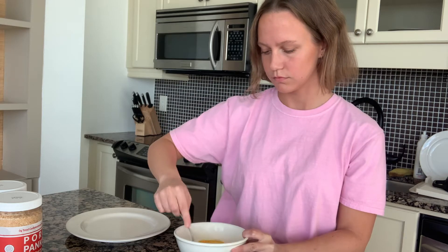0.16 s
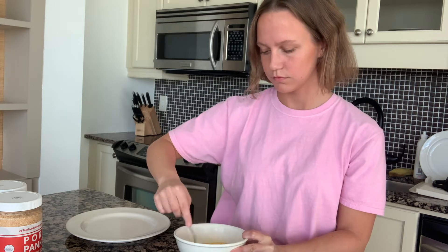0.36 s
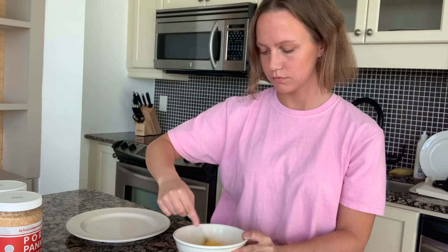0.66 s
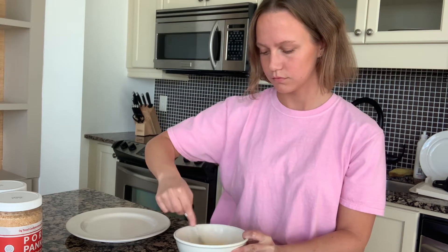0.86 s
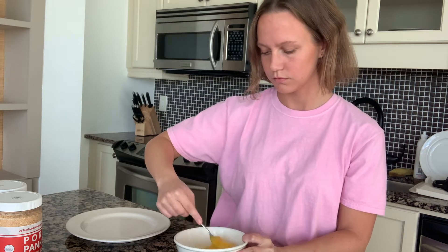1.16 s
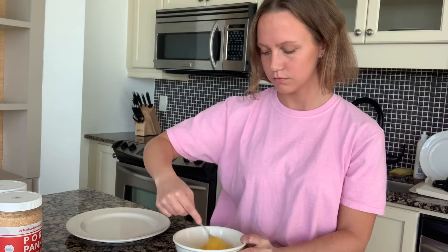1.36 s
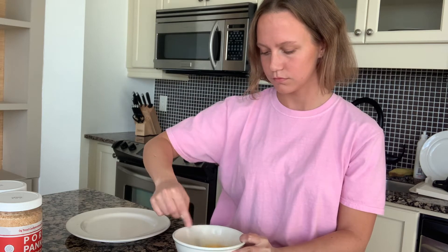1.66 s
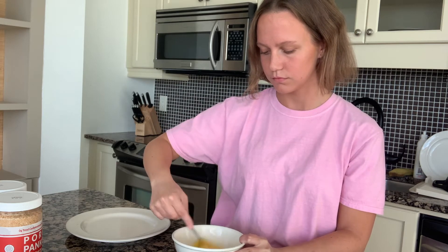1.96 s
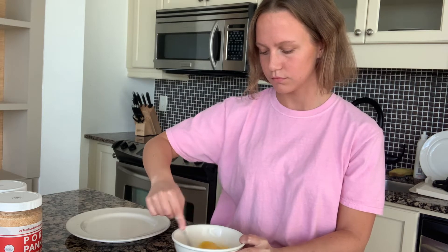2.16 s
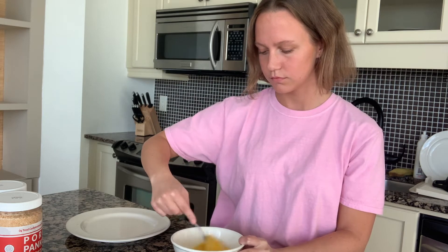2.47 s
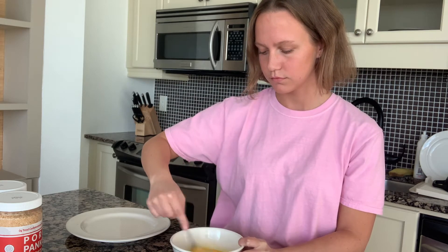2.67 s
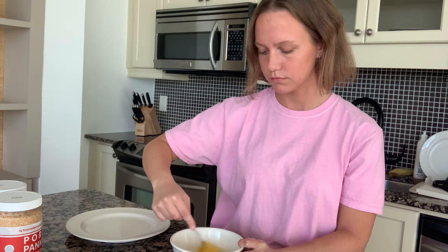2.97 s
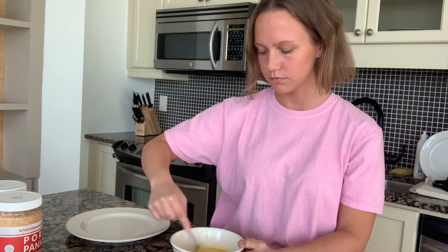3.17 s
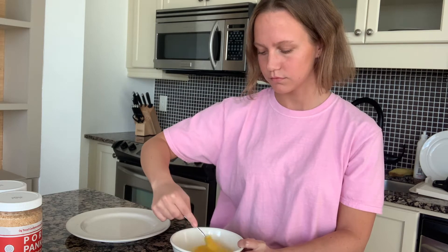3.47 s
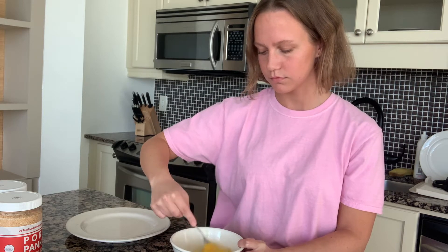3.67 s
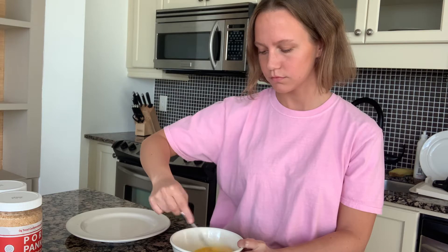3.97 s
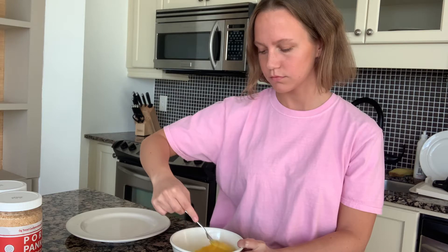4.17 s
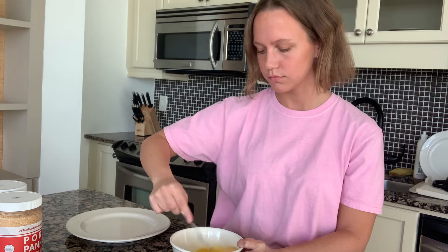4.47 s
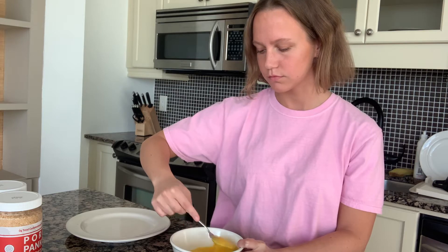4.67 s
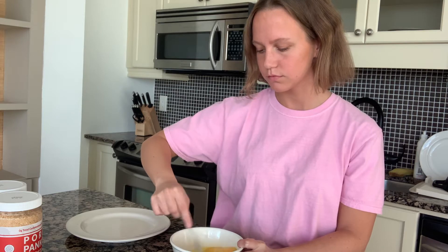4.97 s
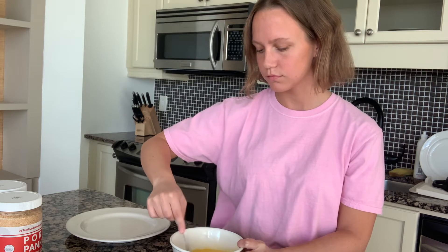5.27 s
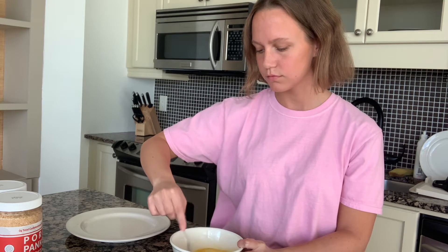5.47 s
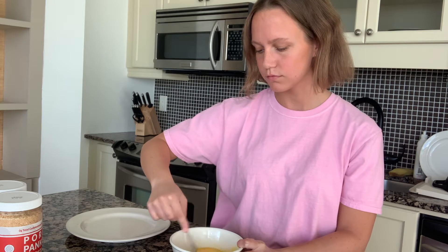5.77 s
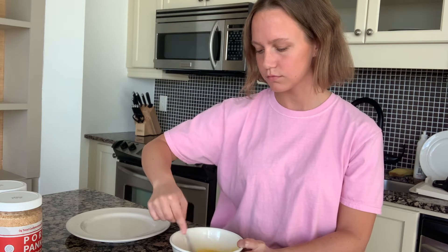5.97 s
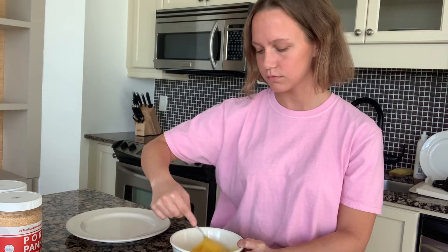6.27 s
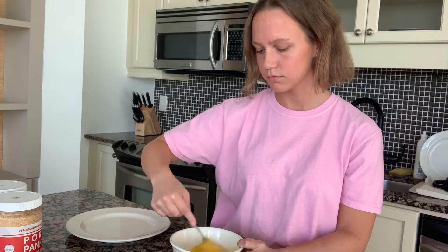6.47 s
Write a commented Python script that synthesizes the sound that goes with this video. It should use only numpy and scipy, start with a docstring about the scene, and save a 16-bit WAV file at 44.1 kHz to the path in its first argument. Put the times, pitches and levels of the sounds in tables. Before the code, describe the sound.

Close up, a fork beats eggs in a ceramic bowl, roughly four soft hissing, sloshing strokes a second, with light metal ticks and tiny rings on the glaze. Just after two seconds the bowl knocks hard on the stone counter in a short, dull clatter, far louder than the rest. The beating carries on, slightly wetter towards the end. Hard-walled kitchen with a short tail and quiet air; close stereo microphone.

```python
"""Fork beating eggs in a ceramic bowl

About four strokes a second hiss through the foam as random grains and slosh the egg as resonant noise.
Tines tick on and scrape the glaze (noise bursts) and rub it (narrow bands), amid short gliding tones.
Knocks of the bowl on a stone counter, once a loud clatter, and light fork taps on it are decaying tones.
A hard-walled kitchen adds a decaying diffuse tail over quiet air; two close microphone ports listen."""
import sys
import numpy as np
from scipy import signal
from scipy.fft import rfft, irfft, next_fast_len
from scipy.io import wavfile
from scipy.ndimage import uniform_filter1d

SR = 44100
rng = np.random.default_rng(int(sys.argv[2]) if len(sys.argv) > 2 else 0)


def digitize_waveform(pressure):
    """Quantize a signal to 16-bit integers and store it at the path in sys.argv[1].

    Rows of a 2-D input are taken as channels; values are limited to [-1, 1].
    """
    field = np.atleast_2d(pressure).T
    bounded = np.clip(field, -1, 1)
    quanta = np.round(bounded * 32767).astype(np.int16)
    wavfile.write(sys.argv[1], SR, quanta)


N = 291942


def amp(db):
    """Level law: decibels to amplitude gain."""
    return 10 ** (np.asarray(db) / 20)


def unit(x):
    """Power normalisation: scale to rms 1."""
    return x / np.sqrt(np.mean(x ** 2) + 1e-20)


def along(points, hz):
    """Log-frequency interpolation of (frequency_hz, value) points."""
    f, v = np.transpose(points)
    return np.interp(np.log(hz + 1), np.log(f + 1), v)


def filtered(x, response):
    """Linear filtering: multiply the spectrum of x by a function of frequency."""
    n = x.shape[-1]
    padded = next_fast_len(n + 8192)
    spectrum = rfft(x, padded) * response(np.fft.rfftfreq(padded, 1 / SR))
    return irfft(spectrum, padded)[..., :n]


def coloured(x, spectrum):
    """Spectral shaping: x with the given colour, at rms 1."""
    return unit(filtered(x, lambda hz: amp(along(spectrum, hz))))


def add(track, s, sound):
    """Superposition: mix a sound into the track at s seconds, cut at both ends of the track."""
    i = min(round(s * SR), N)
    part = sound[..., max(-i, 0):N - i]
    start = max(i, 0)
    track[..., start:start + part.shape[-1]] += part


def grains(per_s):
    """Poisson-like impulses: tiny bursts at random moments and of random size, rms 1."""
    present = rng.random(N) < per_s / SR
    size = rng.standard_normal(N) * amp(2 * rng.standard_normal(N))
    return unit(present * size)


RISE_PER_LENGTH = 0.2743  # longer strokes also take longer to build
FALL_CURVE = 0.15  # how much a decay steepens


def swell(length, rise, fall_db, step=0):
    """Driven envelope: jumps to the share step, builds, and from its length on dies ever faster."""
    t = np.arange(SR // 2) / SR
    build = np.clip(t / (rise + RISE_PER_LENGTH * length), 0, 1) ** 0.8
    after = np.clip(t - length, 0, 1)
    # fall_db is the mean dB per second over the first 0.1 s of decay
    fall = amp(-fall_db * after * (10 * after) ** FALL_CURVE)
    return (step + (1 - step) * build) * fall


CATCH_HZ = 42.97  # the fork catches and slips up to this often


def flutter(size, depth_db):
    """Stick-slip friction: the uneven gain of a fork that catches and slips, rms 1."""
    slow = unit(filtered(rng.standard_normal(size), lambda hz: hz < CATCH_HZ))
    return unit(amp(depth_db * slow))


# How deep the fork digs into the egg: start_s [s], depth_db [dB of low churn relative to effort]
DEPTH = [(0, -14.5), (.85, -29.5), (1.5, -17), (3.1, -11), (3.8, -18.5), (4.1, -9.5), (5, -4.5),
         (5.5, -12.5), (5.72, -4), (6, -16.5), (6.6, -1)]


def depth(s):
    """Immersion: the fork's depth in the egg at s seconds, interpolated in dB."""
    return np.interp(s, *np.transpose(DEPTH))


# Likeness of diffuse sound at the two ports: frequency_hz [Hz], correlation [-1 to 1]
ALIKE = [(200, 0.89), (1000, 0.15), (3000, 0.091)]


def diffuse(size):
    """Diffuse-field coherence: stereo noise alike in the bass and nearly unrelated in the treble."""
    turn = lambda hz: np.arccos(np.clip(along(ALIKE, hz), -1, 1)) / 2
    # the angle shares power between what the ports have in common and what differs
    split = lambda hz: np.array([np.cos(turn(hz)), np.sin(turn(hz))])
    mid, side = filtered(rng.standard_normal((2, size)), split)
    return np.array([mid + side, mid - side])


# Spectrum of the room's air: frequency_hz [Hz], density_db [relative dB per Hz]
AIR = [(20, -26.5), (60, -12.5), (180, -1.5), (400, -6), (1500, -13.5), (4000, -26), (16000, -53.5)]


def room_air(level_db=-73.0):
    """Ambient noise: steady diffuse noise, strongest in the low register."""
    return amp(level_db) * coloured(diffuse(N), AIR)


# Decay of the kitchen's tail: frequency_hz [Hz], t60_s [s]
DECAY = [(150, 0.4), (500, 0.7644), (2000, 0.5866), (4500, 0.56), (15000, 0.27)]
# Colour of the kitchen's tail: frequency_hz [Hz], gain_db [dB]
ECHO = [(4000, 1.5), (7000, 4), (15000, -24)]


def kitchen(x, gap=0.0049, early_db=7, early_s=0.0078):
    """Reverberation: close reflections off counter and cupboards, then a tail that dies by frequency."""
    hz, t, z = signal.stft(diffuse(SR * 3 // 4), SR, nperseg=256)
    tail = signal.istft(z * amp(-60 * t / along(DECAY, hz)[:, None]), SR, nperseg=256)[1]
    t = np.arange(tail.shape[1]) / SR
    # reflections fade in from half the gap to one and a half gaps, strongest early
    onset = np.clip(t / gap - .5, 0, 1)
    tail = tail * onset * (1 + amp(early_db) * np.exp(-t / early_s))
    tail = filtered(tail / np.linalg.norm(tail[0]), lambda hz: amp(along(ECHO, hz)))
    return signal.fftconvolve(x[None], tail, axes=1)


# Phase between the ports: frequency_hz [Hz], left_lead_rad [radians]
LEAD = [(0, 0), (1120, 0.2), (2500, 2.2), (3880, 1.2), (5860, 3.5), (6980, 0.2), (8100, -0.6),
        (11100, -6.2), (14300, -12.3), (16400, -13.0)]


def ports(x, left_db=3):
    """Inter-channel differences: two ports with unequal phase, the middle register louder on the left."""
    f, radians = np.transpose(LEAD)
    tilt = [(200, 0.058), (700, 1), (6000, 0.12)]  # Hz, share of left_db

    def half(hz):
        """Half the difference: one port takes it, the other its inverse."""
        return amp(left_db / 2 * along(tilt, hz)) * np.exp(.5j * np.interp(hz, f, radians))

    return filtered(x, lambda hz: np.array([half(hz), 1 / half(hz)]))


# Knocks of the bowl on the counter and light fork taps on the bowl:
# start_s [s], level_db [relative dB], hardness_hz [Hz]
KNOCKS = [(1.199, -51.5, 2620), (2.2358, -7.5, 2080), (2.411, -2.5, 4600), (2.421, -13.5, 3550),
          (2.602, -19, 1974), (2.6369, -8.5, 2780), (2.6916, -17, 2600), (3.0516, -29.5, 1264),
          (4.5158, -39.5, 1790), (5.196, -36.5, 1250), (5.703, -42.5, 1950), (6.028, -36, 2700),
          (6.601, -39, 2540)]
# Ringing of the knocks, short bowl modes and two long faint low resonances:
# pitch_hz [Hz], level_db [relative dB], t60_s [s]
RINGING = [(572, -47.5, .7), (681, -37.5, 0.77), (975, 0.5, 0.022), (1036, 2.5, 0.013), (1050, -10.5, .018),
           (1420, -13.5, 0.012), (1600, -16, 0.03), (2043, -0.5, 0.016), (2240, -9, 0.0084)]
# Spectrum of the bowl's foot: frequency_hz [Hz], density_db [relative dB per Hz]
FOOT = [(95, -33.5), (165, -17), (700, -9), (1020, 0), (1700, -9.5), (2090, -8.5), (2340, -19), (2530, -10),
        (2760, -22.5), (6500, -34.5)]
# Spectrum of the glazed wall, stirred by egg and tines: frequency_hz [Hz], density_db [relative dB per Hz]
GLAZE = [(600, -23.5), (1400, -15), (2120, 2.5), (2650, -7), (3050, 2.5), (3420, -9.5), (3900, 3),
         (4500, 0), (4950, -14), (5400, -4), (6800, -32)]


def knocks(build=0.0034, crack_db=-19, crack_t60=0.067, wall_db=-15, ring_room_db=-11, thud_room_db=12.5):
    """Impact excitation of damped resonances: harder blows reach higher, and their thud rouses the room."""
    direct, thuds, t = np.zeros(N), np.zeros(N), np.arange(SR * 2 // 3) / SR
    hz, tone_db, t60 = np.transpose(RINGING)[:, :, None]
    impulse = signal.unit_impulse(len(t), int(build * SR))
    thud = (coloured(impulse, FOOT) + amp(wall_db) * coloured(impulse, GLAZE)) / np.sqrt(len(t))
    for s, db, hard_hz in KNOCKS:
        # each blow lands elsewhere, which shifts the most damped resonances most
        shifted = hz + rng.standard_normal(hz.shape) * .25 / t60
        decay = amp(tone_db + rng.standard_normal(hz.shape) - 60 * t / t60)
        tones = decay * np.sin(2 * np.pi * shifted * (t - build))
        crack = amp(crack_db - 60 * t / crack_t60) * coloured(rng.standard_normal(len(t)), FOOT)
        ring = (tones.sum(0) + crack) * (1 - np.exp(-(t / build) ** 2))
        contact = signal.butter(N=3, Wn=min(hard_hz, SR / 3), fs=SR, output="sos")
        blow, push = amp(db) * signal.sosfilt(contact, [ring, thud])
        add(direct, s, blow)
        add(thuds, s, push)
    # the bowl stays in one place, so all blows share one room response for ring and one for thud
    room = amp(ring_room_db) * kitchen(direct) + amp(thud_room_db) * kitchen(thuds)
    return amp(4.0) * ports(direct) + room[:, :N]


# Tines scraping across the glaze: start_s [s], level_db [relative dB]
SCRAPES = [(2.402, -42), (4.53, -50.5), (4.842, -45), (5.333, -53), (6.602, -53)]


def scrapes(length_s=0.014, fall_db=520):
    """Frictional chatter: a quick run of tiny contacts shakes the wall and the foot."""
    pressure = np.zeros(N)
    for s, db in SCRAPES:
        add(pressure, s, amp(db) * swell(length_s, 0, fall_db))
    chatter = sum(coloured(grains(per_s=2500), part) for part in (GLAZE, FOOT))
    return pressure * unit(chatter)


# The fork rubbing along the wall: start_s [s], length_s [s], pitch_hz [Hz], level_db [relative dB]
RUBS = [(0.217, 0.021, 1125, -54.5), (1.102, 0.0076, 3950, -49.5), (1.311, 0.013, 2100, -57),
        (1.967, 0.02, 910, -54.5), (1.969, 0.069, 4110, -57), (4.065, 0.14, 2130, -58),
        (4.318, 0.13, 2044, -56.5), (4.871, 0.016, 930, -46.5), (5.078, 0.068, 1856, -52.5),
        (5.118, 0.0091, 1000, -50.5), (5.231, 0.021, 980, -55.5), (5.278, 0.014, 605, -60.5),
        (5.325, .09, 1970, -60.5), (5.582, 0.017, 948, -54.5), (5.735, 0.031, 719, -52.5),
        (6.22, .015, 3890, -55)]
RUB_WIDTH = 0.09  # width of the singing band as a share of its pitch


def rubs(rise_s=0.012, fall_db=330):
    """Friction-driven resonance: sliding tines make the wall sing in a band broken by catch and slip."""
    out = np.zeros(N)
    for s, length, centre_hz, db in RUBS:
        pressure = swell(length, rise_s, fall_db)
        resonance = lambda hz: 1 / (1 + ((hz / centre_hz - 1) / RUB_WIDTH) ** 2) ** 2
        band = filtered(rng.standard_normal(len(pressure)), resonance)
        sound = band * flutter(len(band), depth_db=3) * pressure
        # give the sound the energy of its pressure envelope
        add(out, s, amp(db) * sound * np.linalg.norm(pressure) / np.linalg.norm(sound))
    return out


# Short gliding tones, low plops and higher rings of tapped bowl:
# start_s [s], level_db [relative dB], pitch_hz [Hz]
GLIDING_TONES = [(.273, -38.5, 3100), (0.5342, -38, 618), (.6615, -41.5, 2104), (.6615, -42.5, 3810),
                 (.9685, -44.5, 623), (1.202, -44.5, 510), (1.202, -54.5, 1446), (1.565, -43, 656),
                 (1.568, -45.5, 1642), (1.749, -45, 2100), (3.06, -45.5, 715.4), (4.519, -42, 816),
                 (4.9437, -46, 1394), (5.549, -41.5, 3087), (6.028, -49, 865), (6.112, -50, 1514)]
TONE_LIFE_S, TONE_SHRINK = 0.017, 0.35  # life at 1000 Hz [s]; exponent by which higher tones are shorter


def gliding_tones(glide=0.06, attack=0.0012, smack_db=-10, smack_t60=0.065):
    """Damped resonance: each tone rises in pitch, wavers and dies fast, beside a band of noise at its pitch."""
    out, t = np.zeros(N), np.arange(SR // 6) / SR
    for s, db, hz in GLIDING_TONES:
        life = TONE_LIFE_S * (hz / 10 ** 3) ** -TONE_SHRINK
        # slow noise unsettles the phase (radians) and the log amplitude
        waver, shake = .3 * unit(filtered(rng.standard_normal((2, len(t))), lambda f: f < hz / 5))
        bend = 1 + glide * (np.minimum(t / life, 2) - .5)
        phase = 2 * np.pi * hz * np.cumsum(bend) / SR + waver
        ring = np.sin(phase) * (1 - np.exp(-t / attack)) * np.exp(shake - (t / life) ** 2)
        band = lambda f: 1 / (1 + (2 * (f / hz - 1)) ** 4)
        smack = unit(filtered(rng.standard_normal(len(t)), band))
        add(out, s, amp(db) * (ring + amp(smack_db - 60 * t / smack_t60) * smack))
    return out


# Fork strokes: start_s [s], length_s [s], effort_db [relative dB]
STROKES = [(-.07, 0.065, -43.5), (0.157, 0.083, -51), (0.383, 0.046, -50), (0.594, 0.098, -58),
           (0.828, 0.06, -51.5), (1.041, 0.081, -54), (1.27, 0.056, -53.5), (1.45, 0.096, -48.5),
           (1.714, 0.048, -57), (1.908, 0.097, -58.5), (2.128, 0.1, -54), (2.387, 0.043, -48.5),
           (2.566, 0.13, -51), (2.845, 0.16, -66.5), (3.119, 0.059, -51), (3.332, 0.082, -55),
           (3.577, 0.052, -54), (3.815, 0.062, -52.5), (4.042, 0.069, -47.5), (4.266, 0.12, -49),
           (4.52, 0.098, -50), (4.781, 0.087, -51.5), (5.008, 0.11, -55), (5.234, 0.11, -53),
           (5.499, 0.082, -51.5), (5.726, 0.058, -48.5), (5.957, 0.055, -55.5), (6.159, 0.071, -55),
           (6.378, 0.07, -55.5), (6.576, 0.084, -45.5)]
# Tines touching the glaze: start_s [s], level_db [relative dB]
TICKS = [(0.4268, -33.5), (0.6609, -32.5), (1.2007, -44), (1.541, -35.5), (1.7495, -35), (2.6302, -23.5),
         (2.687, -31.5), (2.77, -40.5), (2.9851, -35.5), (3.179, -32.5), (3.4144, -33), (3.8566, -31.5),
         (4.0991, -28.5), (4.5339, -37), (4.591, -28.5), (4.9438, -40.5), (5.551, -32.5), (6.4409, -38.5),
         (6.6032, -29.5)]
# Spectrum of a tine tick: frequency_hz [Hz], density_db [relative dB per Hz]
TINE = [(1000, -58), (5400, 2.5), (6500, -16.5), (8000, 5), (16000, -3.5)]
# the wall's ring relative to the tick [dB]; a deep fork meets the wall more squarely [dB per dB]
RING_DB, RING_PER_DEPTH = -8, 0.85


def ticks(tick_t60=0.01, glaze_t60=0.079, entry_db=-61):
    """Impulsive contact: a tine snaps on the wall, a bright tick over a short ring damped by the egg."""
    out, t = np.zeros(N), np.arange(SR // 10) / SR

    def burst(spectrum, t60):
        """Exponential decay of coloured noise."""
        return coloured(rng.standard_normal(len(t)), spectrum) * amp(-60 * t / t60)

    for s, db in TICKS:
        ring_db = RING_DB + RING_PER_DEPTH * depth(s)
        add(out, s, amp(db) * (burst(TINE, tick_t60) + amp(ring_db) * burst(GLAZE, glaze_t60)))
    # the fork smacks faintly as it dips back in, now more, now less
    for s, *_ in STROKES[1:]:
        add(out, s, amp(entry_db + 4 * rng.standard_normal()) * burst(TINE, tick_t60))
    return out


def shifting(x, depth_db):
    """Moving resonances: pockets of liquid change pitch over tens of milliseconds; the loudness stays."""
    z = signal.stft(x, nperseg=256)[2]
    field = rng.standard_normal(z.shape)
    for _ in range(2):
        field = uniform_filter1d(field, size=2, axis=0)  # across frequency
        field = uniform_filter1d(field, size=18, axis=1)  # across time
    shaped = z * amp(depth_db * unit(field))
    shaped = shaped * np.linalg.norm(z, axis=0) / (np.linalg.norm(shaped, axis=0) + 1e-20)
    return signal.istft(shaped, nperseg=256)[1][:N]


def bubbles(flow, count=800):
    """Bubble resonance: unequal bubbles ring briefly at random moments, as strongly as the egg flows."""
    start = rng.integers(0, N, count)[:, None]
    pitch, size = rng.standard_normal((2, count, 1))
    hz = np.clip(3200 * np.exp(.26 * pitch), 1500, 5500)
    cycles = hz * np.arange(SR // 30) / SR
    envelope = np.exp(-cycles / 18) * (1 - np.exp(-cycles))
    ring = np.exp(size / 2) * np.sin(2 * np.pi * cycles) * envelope
    moments = start + np.arange(cycles.shape[1])
    return flow * unit(np.bincount(moments.ravel(), ring.ravel(), N)[:N])


# Spectrum of foam spray: frequency_hz [Hz], density_db [relative dB per Hz]
SPRAY = [(3000, -35.5), (4400, -22), (5550, -3.5), (6100, -18), (6900, -23), (7600, 3.5), (8400, -6),
         (9000, 2.5), (9450, -1), (10100, -0.5), (10600, -10), (11700, -1), (13800, -10.5), (15600, -13.5)]
# Spectrum of egg churn: frequency_hz [Hz], density_db [relative dB per Hz]
CHURN = [(40, -37.5), (430, 10), (720, 8), (1000, 11.5), (1300, -29), (4500, -57.5)]
SLOSH_PER_DEPTH = 0.17  # dB of slosh for each dB of depth
ENTRY_SHARE = 0.053  # share of the spray that starts at once as the fork breaks the surface
SPRAY_RISE_S, SLOSH_RISE_S, CHURN_RISE_S = 0.016, 0.03, 0.034  # before the share of stroke length
SPRAY_FALL_DB_PER_S, SLOSH_FALL_DB_PER_S, CHURN_FALL_DB_PER_S = 262, 211.5, 211


def whisking(spray_db=2.0, slosh_db=-1.36, churn_db=-1.5, bubble_db=-5.5):
    """Flow noise: strokes tear foam into spray; a deeper fork sloshes and churns more of the heavier egg."""
    spray, slosh, churn = np.zeros((3, N))
    for s, length, effort_db in STROKES:
        slosh_level_db = effort_db + SLOSH_PER_DEPTH * depth(s)
        churn_level_db = effort_db + depth(s)
        add(spray, s, amp(effort_db) * swell(length, SPRAY_RISE_S, SPRAY_FALL_DB_PER_S, ENTRY_SHARE))
        add(slosh, s, amp(slosh_level_db) * swell(length, SLOSH_RISE_S, SLOSH_FALL_DB_PER_S))
        add(churn, s, amp(churn_level_db) * swell(length, CHURN_RISE_S, CHURN_FALL_DB_PER_S))
    fizz = shifting(coloured(grains(per_s=14000), SPRAY), depth_db=4.5)
    splash = shifting(coloured(grains(per_s=2200), GLAZE), depth_db=7.5)
    gurgle = shifting(coloured(grains(per_s=2500), CHURN), depth_db=5.5)
    egg = amp(spray_db) * spray * fizz + amp(slosh_db) * slosh * splash
    egg += amp(churn_db) * churn * gurgle + amp(bubble_db) * bubbles(slosh)
    # a high-pass below 170 Hz keeps the stirring free of rumble
    return filtered(egg * flutter(N, depth_db=1.3), lambda hz: np.minimum(hz / 170, 1) ** 2)


def scene():
    """Superposition of direct and reverberant sound: egg, fork and bowl in the kitchen's quiet air."""
    egg = whisking() + rubs()
    tines = ticks() + scrapes()
    tones = gliding_tones()
    room_send = amp(-12.0) * egg + amp(-9.5) * tines + amp(-10.5) * tones
    room = kitchen(room_send)[:, :N]
    return ports(egg + tines + tones) + room + knocks() + room_air()


CEILING = 0.937  # amplitude near which peaks round off
TOP_HZ = 15850  # band limit


def record(dry):
    """Soft saturation and band limiting: the loudest peaks round off, then a steep low-pass acts."""
    held = dry / (1 + (dry / CEILING) ** 6) ** (1 / 6)
    return filtered(held, lambda hz: 1 / np.sqrt(1 + (hz / TOP_HZ) ** 160))


dry = scene()
out = record(dry)
digitize_waveform(out)
```